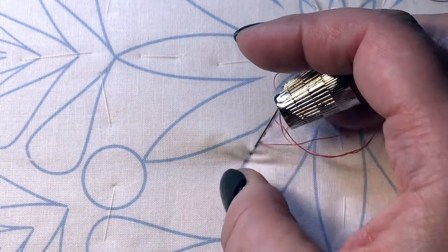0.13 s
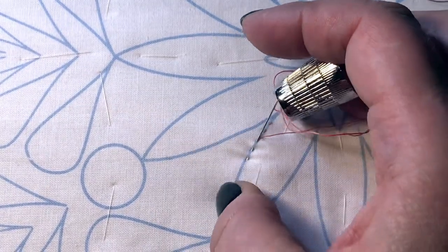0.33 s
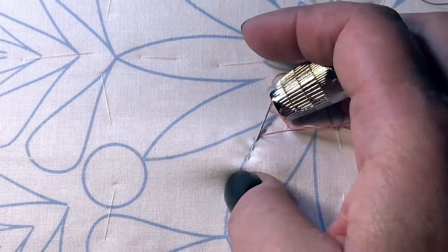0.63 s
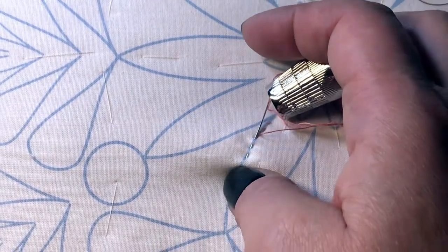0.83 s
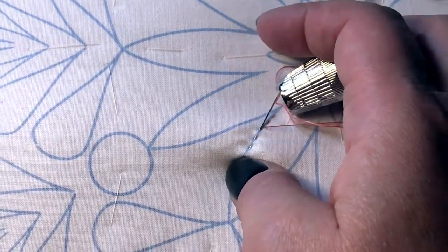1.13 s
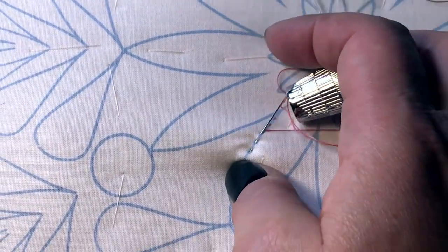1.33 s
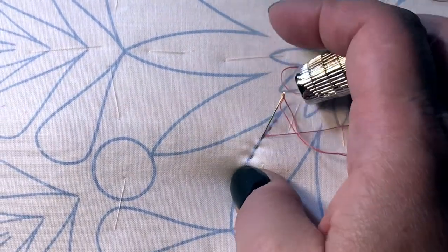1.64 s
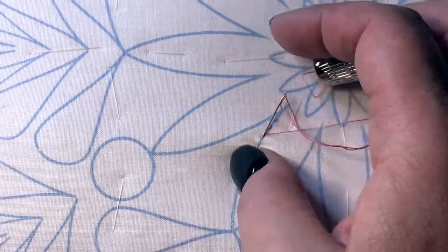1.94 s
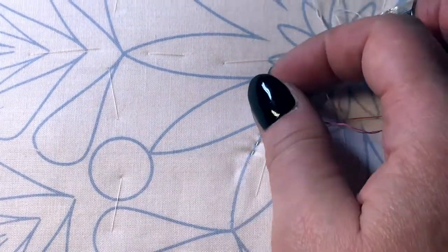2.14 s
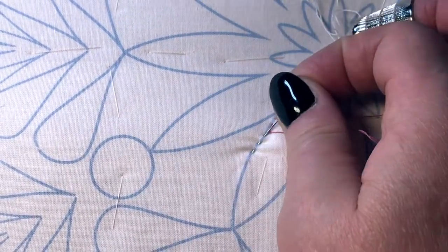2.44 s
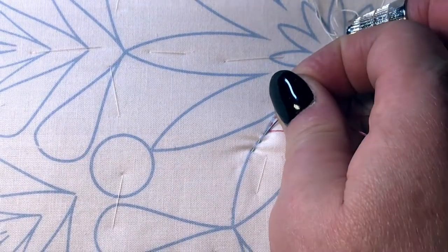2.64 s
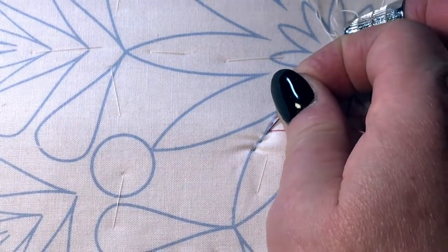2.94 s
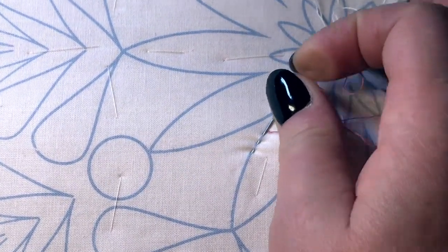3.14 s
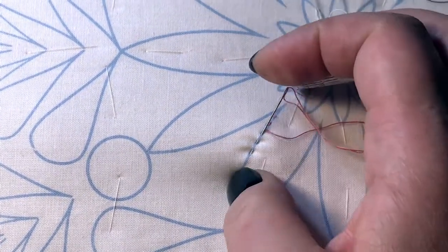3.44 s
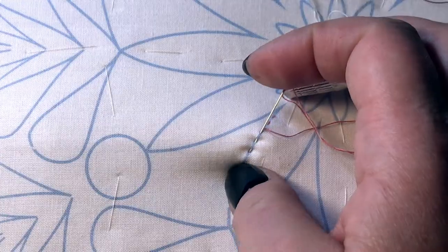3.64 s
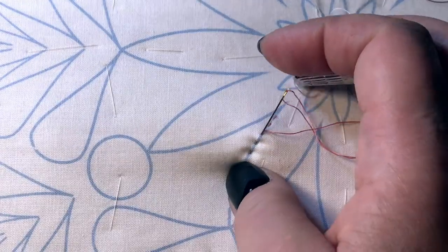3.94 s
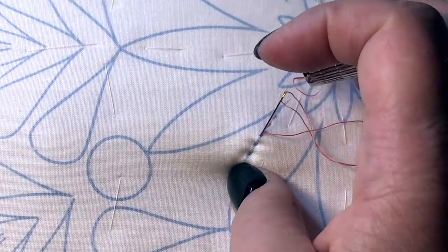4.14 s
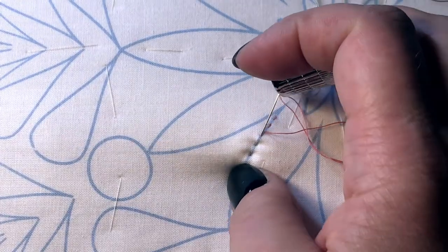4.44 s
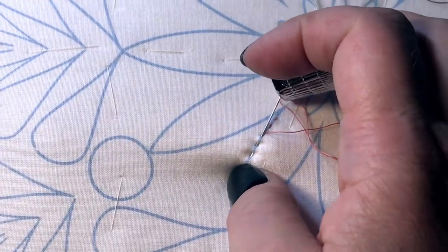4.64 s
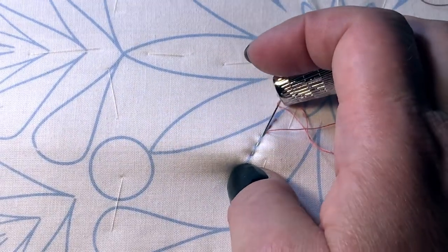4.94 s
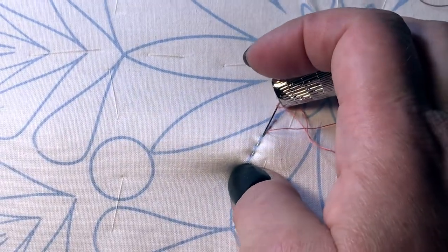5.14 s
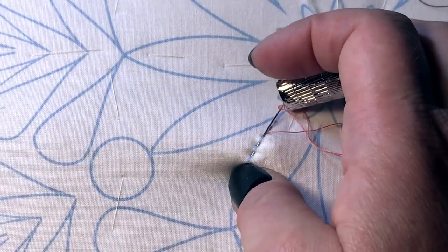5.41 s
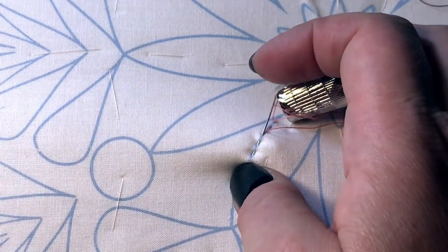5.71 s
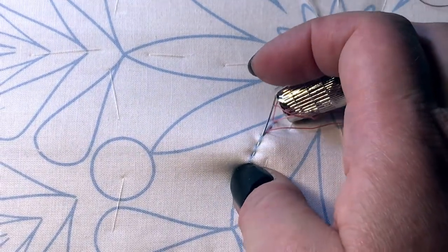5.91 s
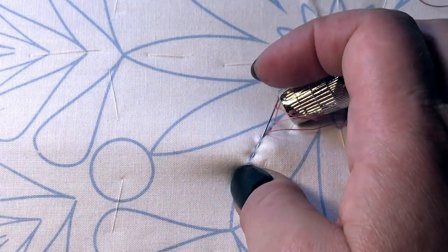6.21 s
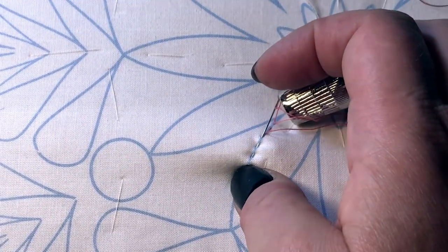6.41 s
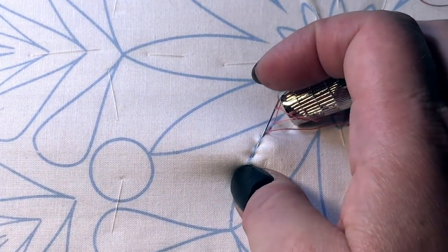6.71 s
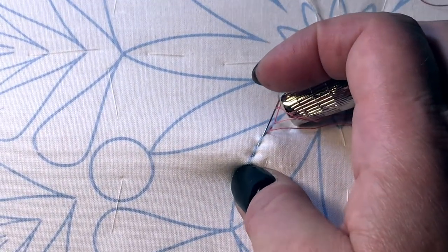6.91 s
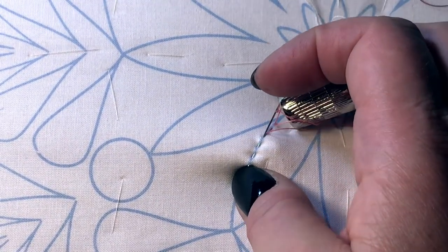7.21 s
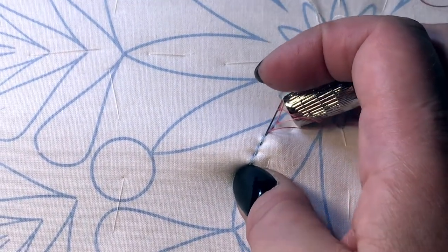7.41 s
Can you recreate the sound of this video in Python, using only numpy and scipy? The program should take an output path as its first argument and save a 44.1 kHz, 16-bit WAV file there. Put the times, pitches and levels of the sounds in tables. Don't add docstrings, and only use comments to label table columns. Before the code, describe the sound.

Close, dry needlework in a quiet indoor space over a steady low hum, thin wavering fan whine and soft hiss. A very faint tick opens, then bright tiny metallic clicks with dull knocks of taut cloth at 0.25 and 0.4 s, softer ones around 0.85 to 1.2, and a sharper double click at 1.27, followed by another pair near 1.46. A light brushing flick comes at 0.65, and hands rumble faintly on the hoop around 1.1. From 1.7 to 4.3 s it is mostly soft, grainy finger rubs, clearest at 2.7 and 3.6, with faint taps near 3.1. Crisp clicks return at 4.4 and 4.6. The sharpest, brightest snap lands at 5.6 with a short hollow cloth thump; the background dips briefly, then recovers. Barely audible taps follow at 6.3 and 6.4. A last strong click and thump at 7.1 gives way to a faint tap and low hand rumble.

```python
import sys
import numpy as np
from scipy import signal
from scipy.fft import rfft, irfft
from scipy.io import wavfile
from scipy.ndimage import uniform_filter1d

SR = 44100
rng = np.random.default_rng(int(sys.argv[2]) if len(sys.argv) > 2 else 0)


def digitize_waveform(pressure):
    field = np.atleast_2d(pressure).T
    bounded = np.clip(field, -1, 1)
    quanta = np.round(bounded * 32767).astype(np.int16)
    wavfile.write(sys.argv[1], SR, quanta)


def natural_amplitude(level_db):
    exponent = np.asarray(level_db, float) / 20
    return 10 ** exponent


N = 333396


def evened(x):
    return x / np.sqrt(np.mean(x ** 2) + 1e-20)


def read(points, hz):
    f, value = np.transpose(points)
    return np.interp(np.log(hz + 1), np.log(f + 1), value)


def add(mix, s, sound):
    part = mix[round(s * SR):][:len(sound)]
    part += sound[:len(part)]


def resonate(x, hz, width):
    turn = np.exp(2j * np.pi * hz * np.arange(len(x)) / SR)
    r = np.exp(-np.pi * width / SR)
    return 2 * (turn * signal.lfilter([1 - r], [1, -r], x / turn)).real


def noise(points, patchy_db):
    a, b, patches = rng.standard_normal((N // 512 + 5, 1025, 3)).T
    patches = uniform_filter1d(patches, size=16, axis=0)
    patches = evened(uniform_filter1d(patches, size=8, axis=1))
    colour_db = read(points, np.fft.rfftfreq(2048, 1 / SR))[:, None]
    z = (a + 1j * b) * natural_amplitude(colour_db + patchy_db * patches)
    top_hz = 15870
    z[round(top_hz * 2048 / SR):] = 0
    return evened(signal.istft(z, nperseg=2048, noverlap=1536)[1][:N])


def burst(chance, hz, width, fall_s):
    t = np.arange(len(chance)) / SR
    fall = np.exp(-t / fall_s) + natural_amplitude(-13.5) * np.exp(-t / 0.0019)
    rattle = rfft(chance * fall * (1 - np.exp(-t / 0.0001)))
    rattle = irfft(rattle / uniform_filter1d(abs(rattle), size=25), len(t))
    first_half = rattle * (t < t[-1] / 2)
    ring = resonate(resonate(first_half, hz, width), hz, width)
    return ring / abs(signal.hilbert(ring)).max()


def pluck(t, hz, glide, glide_s, fall_s, rise_s):
    turns = hz * (t + glide * glide_s * (1 - np.exp(-t / glide_s)))
    return -np.sin(2 * np.pi * turns) * np.exp(-t / fall_s) * (1 - np.exp(-t / rise_s))


def ticks():
    # start in seconds, thimble tick peak in dB, tick centre in Hz,
    # needle snap peak in dB, snap centre in Hz.
    slips = [(0.0203, -65, 11260, -47, 2900), (0.2488, -39, 7000, -35, 4000),
             (0.2496, -31, 12000, -60, 4500), (0.255, -33, 11500, -32, 4260),
             (0.4007, -38, 12300, -37.5, 4800), (0.8415, -56, 8470, -38, 3370),
             (0.9754, -28.5, 9000, -32.5, 3340), (1.174, -47, 11920, -50.5, 3430),
             (1.2678, -17, 12300, -29, 3370), (1.2731, -24, 12000, -25, 3460),
             (1.4533, -27.5, 12900, -32, 5000), (1.4698, -22, 14000, -30, 3120),
             (1.798, -50, 12560, -49, 3860), (1.8571, -53, 10910, -49.5, 4700),
             (3.109, -45, 10500, -40.5, 3740), (4.375, -46, 12860, -52, 3770),
             (4.381, -33, 13100, -41.5, 2950), (4.4035, -20, 14700, -34, 2520),
             (4.6192, -31, 10700, -43.5, 2380), (5.5941, -6, 12950, -31, 3300),
             (5.5958, -26, 12000, -31, 3560), (5.5982, -24, 12130, -30, 5030),
             (7.0888, -14, 10000, -35.5, 3520), (7.0912, -42, 11000, -40.5, 2360)]
    out = np.zeros(N)
    chance = rng.standard_normal((len(slips), 2, 700))
    for (s, tick_db, tick_hz, snap_db, snap_hz), (a, b) in zip(slips, chance):
        width = 20200 - tick_hz
        add(out, s, natural_amplitude(tick_db) * burst(a, tick_hz, width, fall_s=0.0003))
        add(out, s, natural_amplitude(snap_db) * burst(b, snap_hz, 0.6 * snap_hz, fall_s=0.0005))
    bounce_s, bounce_db = 0.00033, -11.5
    return out + natural_amplitude(bounce_db) * np.roll(out, round(bounce_s * SR))


def plucks():
    # start in seconds, hoop knock peak in dB, cloth drum peak in dB,
    # drum pitch in Hz, drum fall in ms.
    pulls = [(0.249, -34, -33, 242, 0.86), (0.2538, -36, -60, 256, 1.5), (0.4006, -45.5, -50.5, 435, 6.1),
             (0.8417, -44, -50.5, 433, 2.6), (1.174, -47, -50, 480, 2.1), (1.268, -48, -43, 490, 2.6),
             (1.2733, -31, -35.5, 428, 1.74), (1.453, -34.5, -42.5, 500, 3.6),
             (1.4702, -31, -21.5, 387, 1.72), (1.857, -53, -46, 288, 4.3), (1.992, -63, -53, 356, 6.1),
             (3.052, -48.5, -59, 252, 1.9), (3.103, -51, -44.5, 292, 1.5), (3.1087, -52, -41.5, 224, 1.8),
             (4.376, -59, -60, 370, 2.2), (4.381, -44, -38.5, 250, 2.3), (4.404, -37, -32.5, 366, 1.04),
             (4.62, -36, -29.5, 356, 2.56), (5.5938, -22, -31, 340, 3.5), (5.5971, -31.5, -18.5, 420, 0.83),
             (6.3, -58.5, -62, 314, 14), (6.402, -55, -57.5, 292, 6.3), (7.0891, -23, -17, 380, 1.34),
             (7.225, -59, -58, 418, 3.5),
             (0.257, -58, -47, 96, 5.3),
        (0.975, -59, -68, 446, 2.5),
        (5.596, -39.5, -48.5, 167, 7),
    ]
    out, t = np.zeros(N), np.arange(2600) / SR
    sway = pluck(t, 180.0, glide=0.067, glide_s=0.01026, fall_s=0.0077, rise_s=0.0038)
    for s, knock_db, drum_db, drum_hz, fall_ms in pulls:
        knock_hz = 1113 + 14 * (knock_db - drum_db)
        knock = pluck(t, knock_hz, glide=0.2, glide_s=0.0005, fall_s=0.0013, rise_s=0.0004)
        overtone = pluck(t, 1.49 * knock_hz, glide=0, glide_s=1, fall_s=0.00095, rise_s=0.00015)
        knock = knock + natural_amplitude(-5.5) * overtone
        drum = pluck(t, drum_hz, glide=1.1, glide_s=0.0007, fall_s=fall_ms / 1000, rise_s=0.0009)
        add(out, s + 0.00038, natural_amplitude(knock_db + 4.0) * knock)
        add(out, s + 0.00014, natural_amplitude(drum_db + 10.5) * (drum + natural_amplitude(-20.0) * sway))
    return signal.lfilter(*signal.butter(2, 90, "high", fs=SR), out)


def brushes():
    # pitch in Hz, level in dB per Hz.
    fizz = [(1000, -15.5), (2000, -8.5), (3300, -6), (4500, -10), (6300, -6.5), (8500, -21.5), (11000, -32)]
    sheen = [(5000, -18), (8000, 7), (10500, 2), (13000, 6), (16500, 8)]
    rub = [(200, -11), (450, 13), (800, 4.5), (1100, 8), (1800, -5), (3500, -54)]
    hoop = [(110, -27), (190, -3.5), (290, 0), (420, -7), (700, -14.5), (1500, -32.5)]
    # start in seconds, fall in seconds,
    # fizz in dB, sheen in dB, rub in dB.
    flicks = [
        (0.652, 0.032, -58, -67, -68),
        (1.275, 0.034, -59, -66, -82),
        (1.795, 0.0057, -62.5, -76, -62),
        (2.68, 0.023, -54, -67, -55),
        (3.174, 0.088, -65.5, -68, -62.5),
        (3.237, 0.13, -68, -76, -67.5),
        (3.614, 0.015, -53, -69, -65),
        (3.626, 0.041, -78, -78, -56.5),
    ]
    # start in seconds, fall in seconds, fizz in dB, sheen in dB, rub in dB.
    strokes = [
        (1.68, 0.032, -61.5, -67, -60),
        (1.88, 0.2, -67, -66, -61.5),
        (2.06, 0.33, -91, -104, -66),
        (2.69, 0.049, -81, -89, -63.5),
        (3.7, 0.021, -81, -84, -57.5),
        (4.04, 0.05, -69, -70, -83),
        (4.32, 0.064, -86, -80, -60),
    ]
    # middle in seconds, spread in seconds, rumble in dB.
    shifts = [
        (0.05, 0.1, -76),
        (1.08, 0.24, -54.5),
        (2.02, 0.25, -70.5),
        (3.28, 0.12, -58),
        (3.8, 0.36, -62),
        (4.979, 0.31, -64.5),
        (5.4, 0.089, -67),
        (6.151, 0.11, -63),
        (6.651, 0.48, -65),
        (7.33, 0.17, -58.5),
    ]
    t = np.arange(N) / SR
    grain = natural_amplitude(2.7 * rng.exponential(1, N // 40 + 1)).repeat(40)[:N]
    grain = evened(uniform_filter1d(grain, size=30))
    layers = np.array([noise(fizz, patchy_db=1) * grain, noise(sheen, patchy_db=3.5), noise(rub, patchy_db=5)])
    weight = natural_amplitude(-70)
    for s, spread, db in shifts:
        weight = weight + natural_amplitude(db) * np.exp(-((t - s) / spread) ** 2)
    out = natural_amplitude(-7) * weight * noise(hoop, patchy_db=0.0)
    for rise_s, rows in ((0.0036, flicks), (0.028, strokes)):
        for s, fall_s, *levels_db in rows:
            swell = np.clip((t - s) / rise_s, 0, 1)
            stroke = swell * np.exp(-np.maximum(t - s - rise_s, 0) / fall_s)
            out += stroke * (natural_amplitude(np.array(levels_db)) @ layers)
    return out


def room(x):
    # pitch in Hz, time to fall by 60 dB in seconds.
    decay = [(150, .3), (400, .27), (1000, .3), (2500, .26), (6000, .24), (15000, .2)]
    # pitch in Hz, level in dB.
    colour = [(150, 7), (400, 3.5), (900, 6.5), (1600, -0.5), (2500, 4.5), (3600, -1.5), (9000, -4),
              (15000, -13), (15900, -21.5), (16100, -43.5)]
    taps = np.zeros(SR // 2)
    at = np.arange(170, SR // 2 - 20, 20)
    taps[at + rng.integers(0, 20, len(at))] = rng.choice([-1., 1.], len(at))
    hz, t, z = signal.stft(taps, SR, nperseg=256)
    z = z * natural_amplitude(read(colour, hz)[:, None] - 60 * t / read(decay, hz)[:, None])
    tail = signal.istft(z, SR, nperseg=256)[1]
    return signal.fftconvolve(x, tail / np.linalg.norm(tail))[:N]


def low_hum():
    # pitch in Hz, level in dB rms.
    tones = [(53.6, -74.5), (119.9, -60), (179.5, -97.5), (269.5, -75)]
    t = np.arange(N) / SR
    return sum(natural_amplitude(db - 0.5) * np.sin(2 * np.pi * (hz * t + rng.random())) for hz, db in tones)


def fan_whine():
    tones_hz = [1126, 1182, 1209, 1446, 2466, 2681, 3010, 3624, 4142, 4512, 4600, 5400, 5670, 5759, 6003]
    # level at the start in dB, level at the end in dB, throb depth from 0 to 1.
    levels = [(-80.5, -80.5, 0), (-73.5, -75, 0.13), (-76.5, -82, 0), (-81, -97.5, 0.05), (-89, -85.5, 0.4),
              (-78.5, -78, 0.49), (-99.5, -97, 0.4), (-97.5, -93, .3), (-74, -91, 0.5), (-76, -78.5, 1),
              (-80, -81.5, 1), (-81.5, -80.5, 1), (-78, -89.5, 1), (-72.5, -81, 0.5), (-92, -103.5, 1)]
    fan_turns_hz = 26.9
    t = np.arange(N) / SR
    out = np.zeros(N)
    for hz, (start_db, end_db, depth) in zip(tones_hz, levels):
        white = rng.standard_normal(N)
        waver = resonate(resonate(white, hz, 13.0), hz, 13.0)
        steady = waver / abs(signal.hilbert(waver)) ** 1.03
        line = evened(steady) + 0.5 * evened(resonate(white, hz, 93.0))
        turning = np.cos(2 * np.pi * (fan_turns_hz * t + rng.random()))
        throb = 1 + 2 * np.clip(depth, 0, 1 / 4) * turning
        out += natural_amplitude(start_db + (end_db - start_db) * t / t[-1]) * evened(line * throb)
    return out


def air():
    # pitch in Hz, level in dB per Hz.
    colour = [(12, -51), (28, -15.5), (52, 3), (110, -3), (250, -4), (500, -18.5), (1200, -17), (2200, -23),
              (6000, -24.5), (7800, -30.5), (8600, -28.5), (10500, -35), (12000, -28.5), (17000, -34)]
    return natural_amplitude(-61.5) * noise(colour, patchy_db=1.04)


def scene():
    near = ticks() + plucks() + brushes()
    background = low_hum() + fan_whine() + air()
    return (near + natural_amplitude(-20.0) * room(near) + background)[None]


def top_cut(x):
    return signal.sosfilt(signal.butter(12, 17150, fs=SR, output="sos"), x)


def record(dry):
    duck_from_db, duck_share, recover_db_per_s = -39, 0.44, 28
    wait_s, ease_s = 0.02, 0.18
    t = np.arange(N) / SR
    power_db = 10 * np.log10(abs(uniform_filter1d(dry[0] ** 2, size=600)) + 1e-12)
    climb = recover_db_per_s * t
    held_db = np.maximum.accumulate(power_db + climb) - climb
    over_db = np.maximum(held_db - duck_from_db, 0)
    eased_db = uniform_filter1d(over_db, size=round(ease_s * SR))
    duck_db = duck_share * np.interp(t - wait_s - ease_s / 2, t, eased_db)
    gain_db = 2.5 - 3.5 * t / t[-1] - duck_db
    edge = signal.firwin(121, 16250, window=("kaiser", 5), fs=SR)
    mix = signal.oaconvolve(dry * natural_amplitude(gain_db), edge[None], "same")
    return top_cut(mix)


dry = scene()
out = record(dry)
digitize_waveform(out)
```